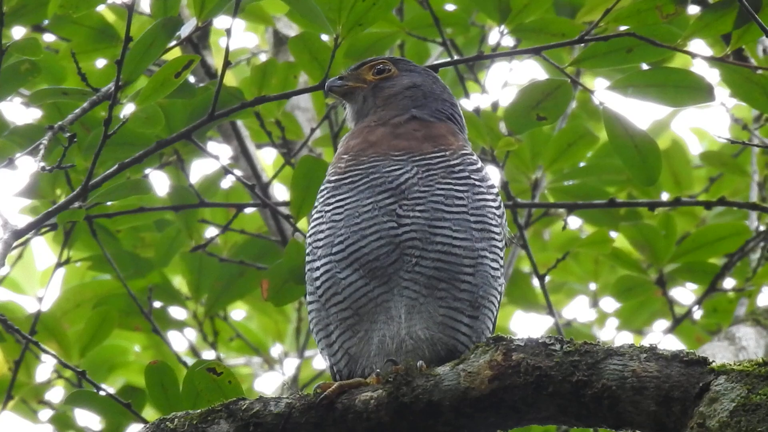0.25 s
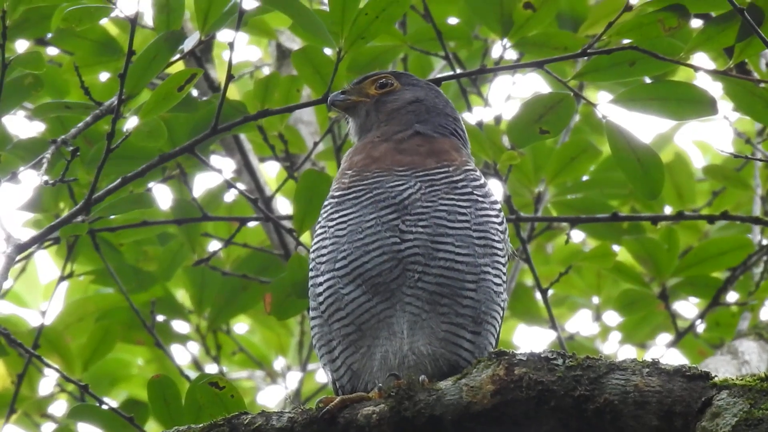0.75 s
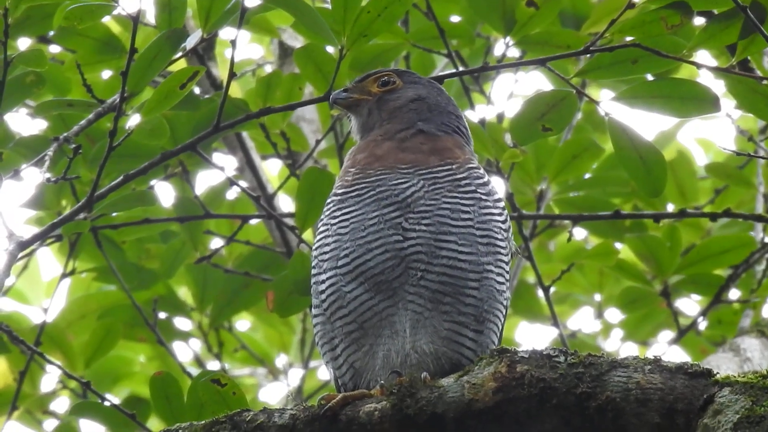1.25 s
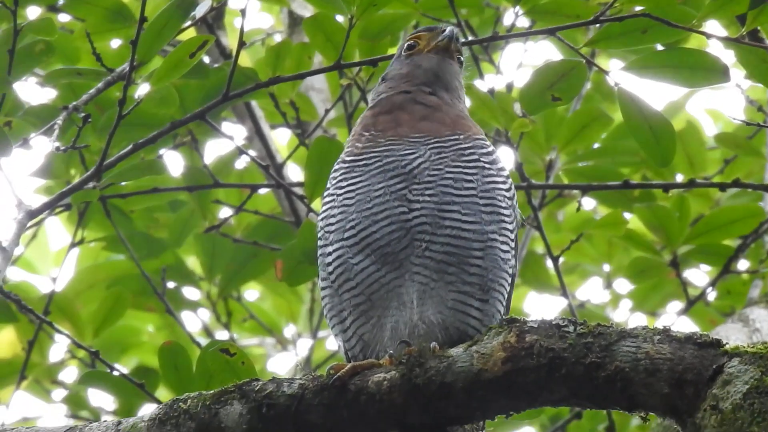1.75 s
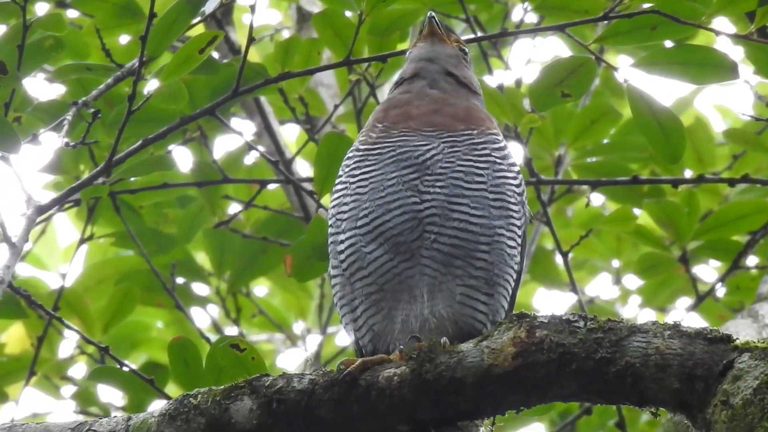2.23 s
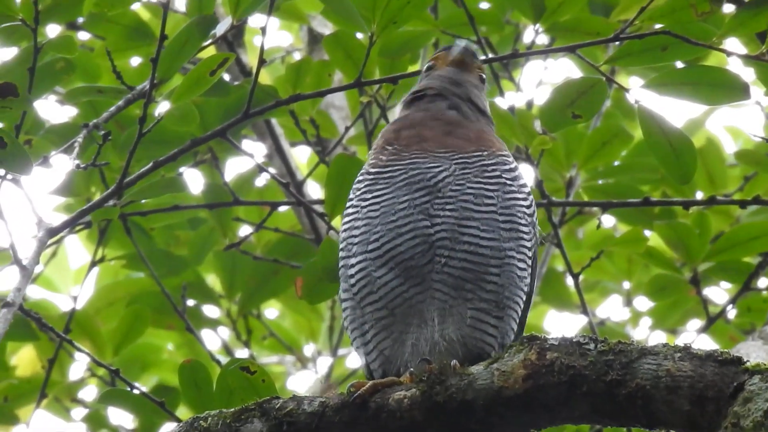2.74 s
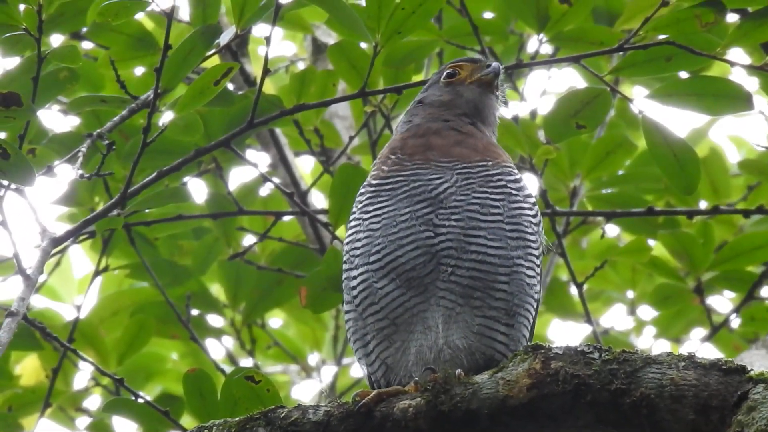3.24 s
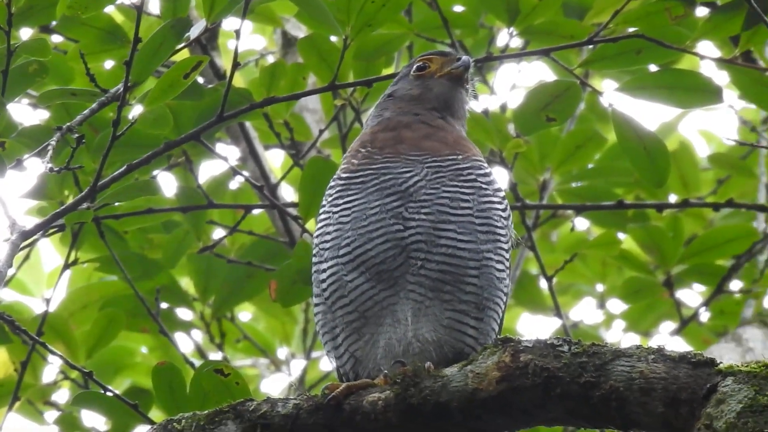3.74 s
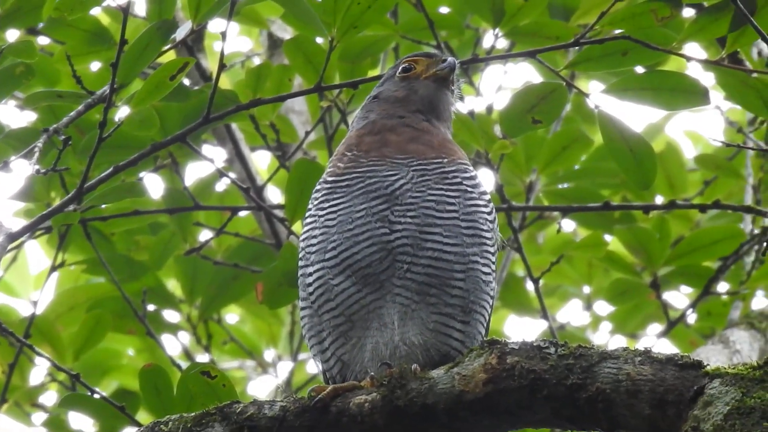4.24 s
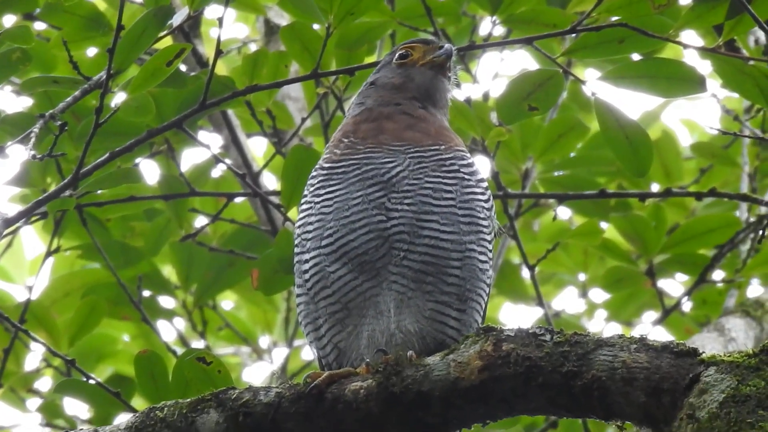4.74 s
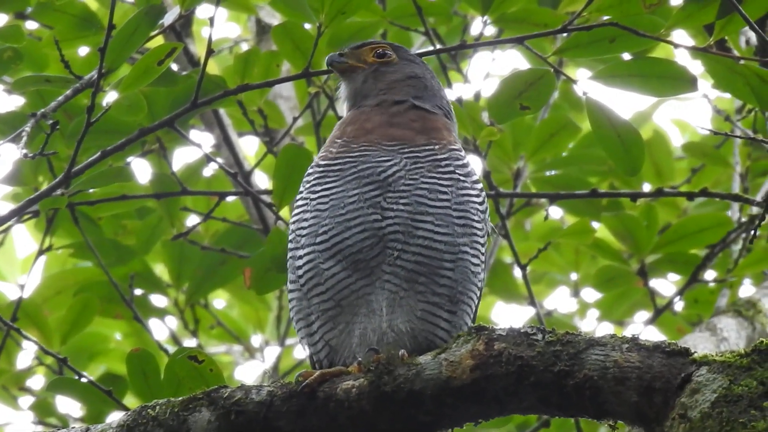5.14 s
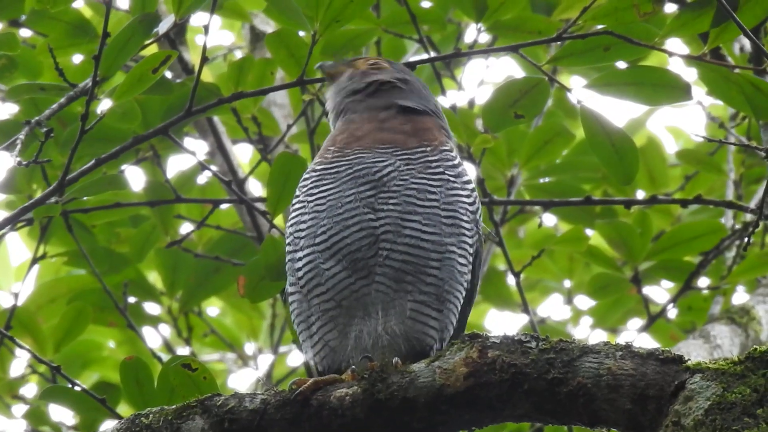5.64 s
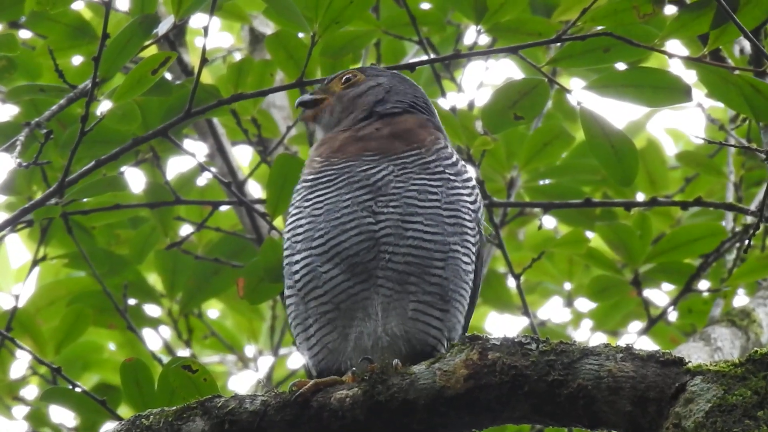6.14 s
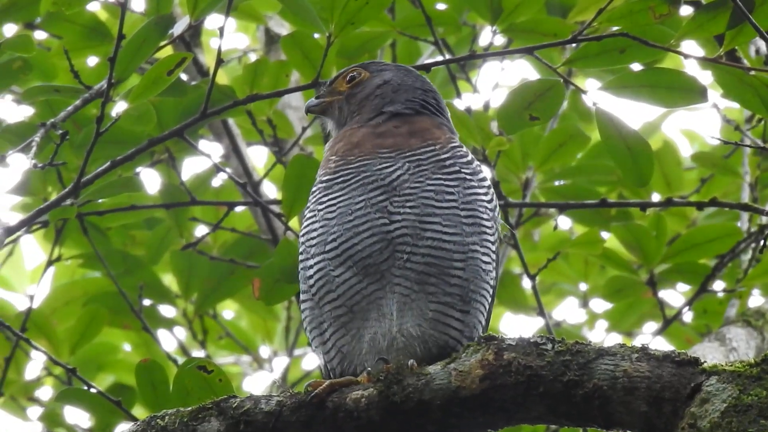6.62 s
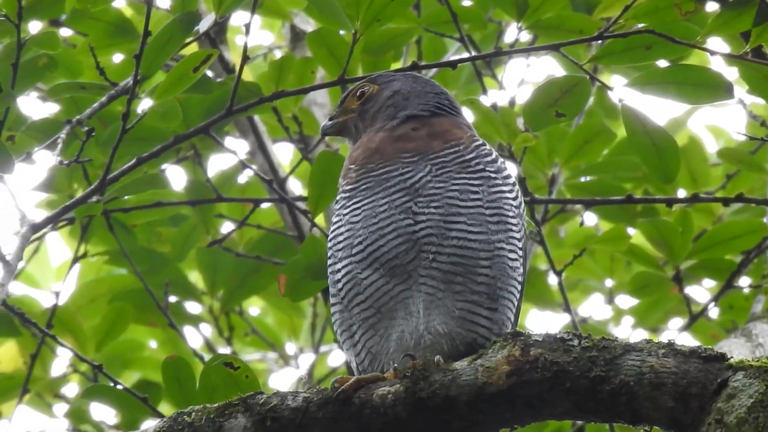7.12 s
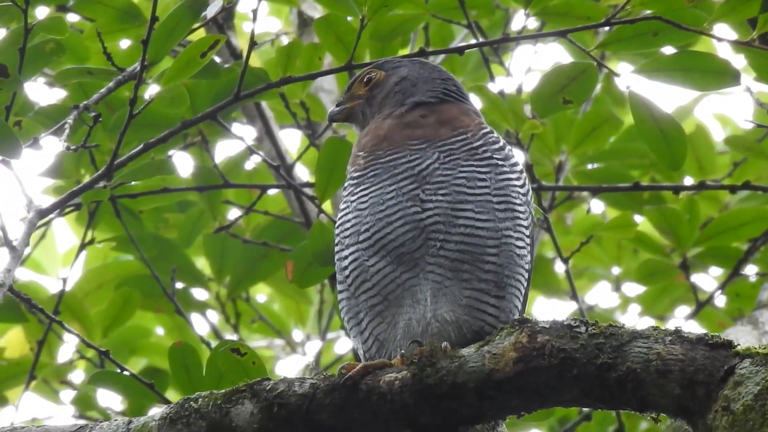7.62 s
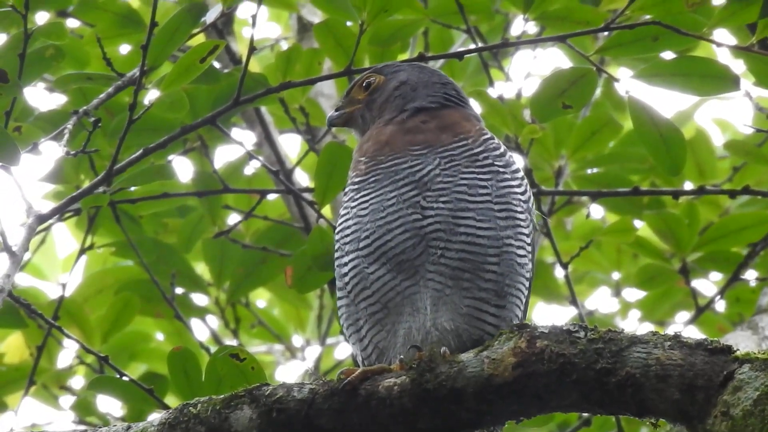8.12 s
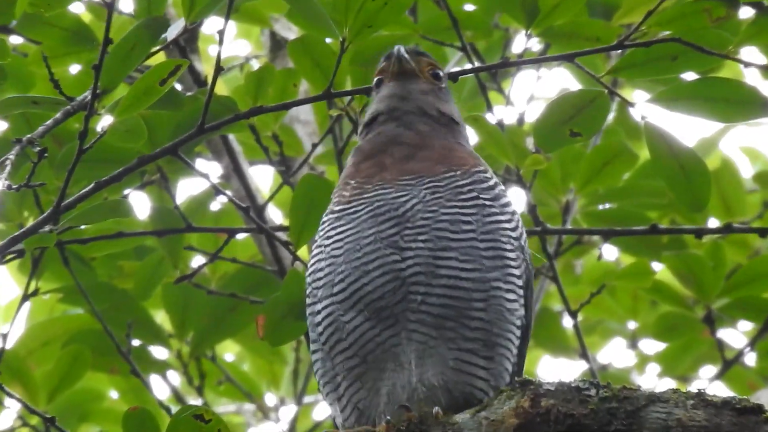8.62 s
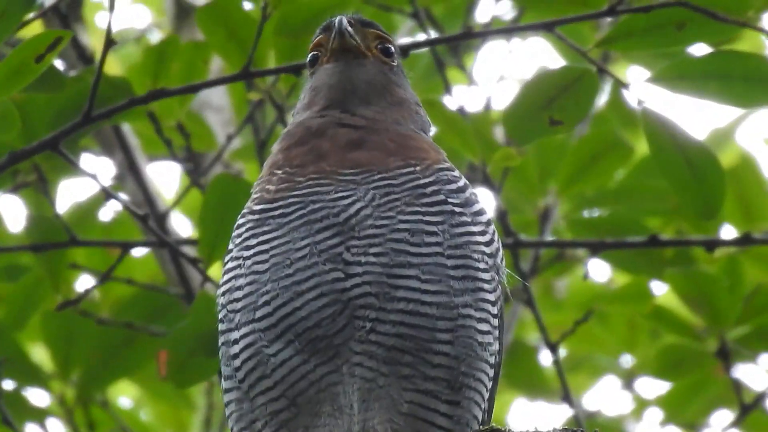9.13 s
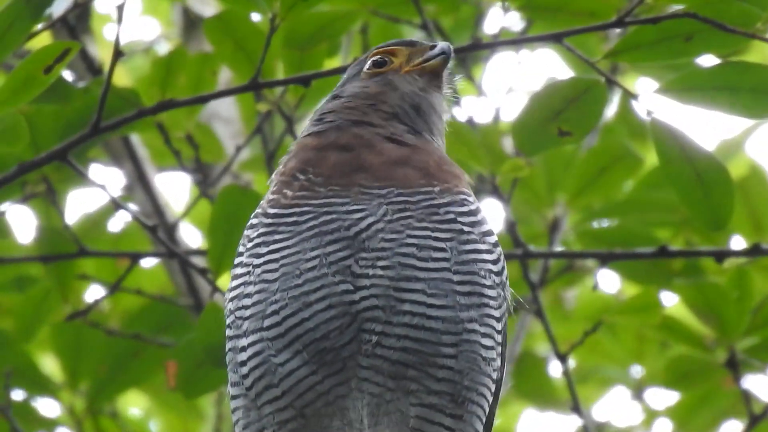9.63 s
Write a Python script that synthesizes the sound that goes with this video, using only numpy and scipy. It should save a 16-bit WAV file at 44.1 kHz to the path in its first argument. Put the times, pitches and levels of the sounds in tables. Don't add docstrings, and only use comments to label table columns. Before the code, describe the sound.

Forest ambience lasts about ten seconds: low, soft distant air and leaves with a faint steady insect hiss near 6 kHz. A high rising chirp is already under way at the start, then a bright arched call at 0.5 s and thin, distant seeps. Echoing scolding chips recur about once a second. A close falcon gives a soft falling hoot at 1.6 s, then four harsh, sagging yelps from 2.3 to 2.9 s, the middle two highest. Small birds continue, with a rising call at 3.8 s and a buzzy trill at 4.4 s. The falcon hoots at 5.0 s and barks again from 5.7 to 6.3 s. Another loud rising chirp comes at 8.1 s. A lens motor whirs from 8.4 to 9.2 s, swelling close to the microphone, with small knocks and a sharp click at 9.1 s. The falcon hoots at 8.7 s, then gives an opener and two barks from 9.3 to 9.7 s.

```python
import sys
import numpy as np
from scipy import signal
from scipy.io import wavfile
from scipy.ndimage import uniform_filter1d

SR = 44100
rng = np.random.default_rng(int(sys.argv[2]) if len(sys.argv) > 2 else 0)


def decibels_to_gain(level_db):
    exponent = np.asarray(level_db, float) / 20
    return 10 ** exponent


def dump(signal):
    limited = np.clip(np.atleast_2d(signal).T, -1, 1)
    pcm = np.round(limited * 32767).astype(np.int16)
    wavfile.write(sys.argv[1], SR, pcm)


N = 435266
LEAD = 4410

# start in seconds, length in seconds, effort in dB, first pitch in Hz.
HOOT_NOTES = [
    (1.644, 0.053, -22, 908),
    (5.008, 0.06, -22, 914),
    (8.68, .049, -21.5, 939),
]
OPENER_NOTES = [
    (2.281, 0.061, -18, 1057),
    (5.723, 0.061, -18.5, 1020),
    (9.339, .056, -16.5, 1052),
]
BARK_NOTES = [(2.472, 0.048, -12, 1323), (2.618, 0.043, -12.5, 1340), (5.935, 0.046, -13, 1342),
              (6.081, 0.035, -12, 1365), (9.533, 0.052, -13, 1335), (9.681, 0.045, -12, 1360)]
CLOSER_NOTES = [
    (2.818, .052, -12.5, 1188),
    (6.277, .052, -13.5, 1198),
]
# share of the length, share of the first pitch, effort in dB, beak ring in dB.
HOOT_SHAPE = [(0, 1, -5.5, 27), (0.302, 0.92, 1.5, 22.5), (0.601, .86, -9, 21), (1, .73, -9.5, 25)]
OPENER_SHAPE = [(0, 0.99, -1, 8), (0.169, .96, -1.5, 19.4), (0.682, .835, -3, 20), (1, .65, -13, 16)]
BARK_SHAPE = [(0, 0.97, -1, 6.2), (.2, .885, -1.5, 2.4), (.66, .68, -5.5, 8), (1, .615, -14.5, 11)]
CLOSER_SHAPE = [(0, 0.97, -1, 2.8), (.33, 0.98, -2, 2.3), (.62, .785, -6, 9), (1, .69, -14, 14)]


def falcon(mix, tails):
    falcon_notes(mix, tails, HOOT_NOTES, HOOT_SHAPE,
                 ring_hz=(7100, 6900), bright_db=(-4.5, -12), chest_db=(3.5, 9))
    falcon_notes(mix, tails, OPENER_NOTES, OPENER_SHAPE,
                 ring_hz=(7000, 6700), bright_db=(.6, -7), chest_db=(-2.5, 7))
    falcon_notes(mix, tails, BARK_NOTES, BARK_SHAPE,
                 ring_hz=(6350, 6800), bright_db=(3.5, -6.5), chest_db=(-1.5, 3.5))
    falcon_notes(mix, tails, CLOSER_NOTES, CLOSER_SHAPE,
                 ring_hz=(6000, 6800), bright_db=(6, -5.5), chest_db=(-4.5, 3.5))


# frequency in Hz, gain in dB.
THROAT_COLOUR = [(550, -3.5), (1000, -6), (1400, -13), (1900, -1.5), (2500, -0.5), (3100, -0.5),
                 (4300, -8.5), (5500, -2.5), (8300, -8), (9600, -12), (10900, -22.5), (13000, -47.5),
                 (15500, -53)]
VOICE_FOLDS = [-4, 9, -7, -9, -7.5, -5.5]
# delay in seconds, level in dB.
NEAR_BRANCHES = [(.0045, -8.5), (.009, -10), (.015, -13)]


def falcon_notes(mix, tails, calls, shape, ring_hz, bright_db, chest_db):
    hum_s, yelp_s = .013, .018
    share, *form = np.transpose(shape)
    for start, length, top_db, top_hz in calls:
        t = np.arange(-hum_s, length + yelp_s, 1 / SR)
        u = t / length
        sag, effort_db, ring_db = (np.interp(u, share, column) for column in form)
        hum = np.interp(t, [-hum_s, -.004, -.002], [1.6, 1, 0])
        yelp = np.clip((t - length) / yelp_s, 0, 1)
        effort_db = top_db + effort_db - 17 * hum - 17 * yelp
        wobble = np.interp(u, [0, 1], [.005, .046]) * wander(len(t), 77.5)
        hz = top_hz * sag * (1 - .26 * yelp) * (1 + wobble)
        turns = np.cumsum(hz) / SR
        cavity_hz = np.interp(u, [0, 1], ring_hz)
        shine_db = np.interp(u, [0, 1], bright_db) - 14 * hum
        stretch = (1100 / top_hz) ** .5 - 1
        stack = 0
        for k, folds_db in enumerate(np.pad(VOICE_FOLDS, (0, 14), "edge"), 1):
            tone_hz = k * hz
            throat_db = read(THROAT_COLOUR, tone_hz * (1 + stretch * np.exp(-(tone_hz / 5000) ** 2)))
            ring = (ring_db - 9 * hum) * np.exp(-((tone_hz - cavity_hz) / 600) ** 2)
            treble = shine_db * np.clip((tone_hz - 3500) / 1500, 0, 1)
            if k > 1:
                uneven = min(1.16 * k, 4.5) * wander(len(t), 250)
            else:
                uneven = np.interp(u, [0, .6], chest_db) + 2.4 * wander(len(t), 300)
            gain = decibels_to_gain(folds_db + throat_db + ring + treble + uneven) * (tone_hz < 15700)
            stack = stack + gain * np.cos(2 * np.pi * k * turns + k * k)
        hoarse = 1 + 0.14 * wander(len(t), 60)
        effort = uniform_filter1d(decibels_to_gain(effort_db - 5.5), size=90)
        note = effort * stack * hoarse * signal.windows.tukey(len(t), .1)
        note = signal.sosfilt(signal.butter(4, 420, "high", fs=SR, output="sos"), note)
        note = np.pad(note, (0, SR // 20))
        limbs = sum(decibels_to_gain(db) * np.roll(note, round(s * rng.uniform(.8, 1.2) * SR)) for s, db in NEAR_BRANCHES)
        add(mix, start + t[0], echoes(note + limbs, tails, wet_db=-6.0, build_s=0.0017, pan_db=1.5))


# start in seconds, length in seconds, level in dB.
SCOLD_CHIPS = [(0.044, 0.022, -24), (1.328, 0.021, -24.5), (2.142, 0.024, -24.5), (2.92, 0.024, -22.5),
               (3.72, 0.019, -24), (4.752, .029, -25), (5.735, .034, -27), (6.743, 0.023, -23),
               (7.938, 0.028, -24.5), (9.007, 0.017, -21.5)]
# from Hz, to Hz.
SCOLD_SWEEP = (1440, 2880)
# start in seconds, length in seconds, from Hz, to Hz, level in dB.
RISING_CALLS = [
    (-.07, 0.066, 4200, 6240, -18.5),
    (3.811, 0.053, 4060, 6365, -18.5),
    (8.138, 0.065, 4180, 6395, -16.5),
]
ARCHED_CALLS = [
    (.518, 0.044, 4550, 8190, -18),
    (4.341, .038, 5120, 7070, -37),
    (4.37, 0.11, 4240, 8010, -22),
    (8.836, 0.076, 4444, 8220, -21.5),
]
DROPPING_CALLS = [
    (.579, 0.014, 6000, 2540, -23.5),
    (4.436, 0.014, 6600, 3820, -25.5),
    (8.901, 0.013, 6470, 4060, -24),
]
CHUP_CALLS = [
    (.594, 0.034, 1410, 3500, -39),
    (.604, 0.028, 3070, 3546, -31.5),
    (5.225, .014, 2310, 3500, -38),
    (5.237, 0.024, 3400, 3727, -31),
    (5.243, 0.019, 1900, 3370, -35),
]
CLOSE_CHIPS = [
    (9.155, 0.009, 3070, 3570, -27),
    (9.162, .04, 2356, 3710, -27.5),
    (9.265, 0.017, 2997, 3630, -32),
    (9.277, 0.034, 2260, 3380, -30.5),
]
SEEP_CALLS = [(0.449, 0.056, 6870, 6540, -37), (.944, .25, 7080, 6650, -39),
              (1.519, 0.044, 6900, 7280, -44), (1.801, 0.23, 7000, 6460, -38),
              (3.637, 0.16, 6780, 6950, -36), (3.95, 0.062, 7630, 7200, -39.5),
              (4.971, .16, 7000, 6400, -36), (6.51, .26, 7000, 6390, -36.5), (7.531, 0.24, 6705, 6490, -38),
              (8.399, 0.3, 6580, 6280, -38.5)]
# start in seconds, length in seconds, pitch in Hz, level in dB.
FAR_PIPES = [(1.42, 0.018, 2050, -52), (1.575, .05, 2280, -57), (4.245, 0.075, 6700, -58),
             (4.349, .019, 2500, -52.5), (4.4, .027, 1963, -55), (4.49, 0.033, 2100, -61),
             (5.142, 0.1, 5140, -52), (5.425, 0.066, 5020, -52.5), (5.626, 0.1, 4640, -57.5),
             (6.966, 0.11, 3770, -60), (8.463, 0.033, 2395, -53), (8.969, 0.11, 2300, -52)]


def canopy(mix, tails):
    scolds = [(s, length, *SCOLD_SWEEP, db) for s, length, db in SCOLD_CHIPS]
    pipes = [(s, length, hz, hz - 50, db) for s, length, hz, db in FAR_PIPES]
    songbird(mix, tails, scolds, lambda u: u ** 1.8, [2.5, 8.0, 5.5, -4, -3, -12.5],
             wet_db=8.0, build_s=.006, waver=0.05, swell=1.5, pan_db=2.5, open_db=17)
    songbird(mix, tails, RISING_CALLS, lambda u: np.minimum(u / .75, 1) ** 0.78, [0, -15],
             wet_db=12, build_s=0.0037, waver=0.01, swell=2.3)
    songbird(mix, tails, ARCHED_CALLS, trill, [0], wet_db=10.5, build_s=0.0012, waver=0.0068, swell=0.59)
    songbird(mix, tails, DROPPING_CALLS, straight, [0], wet_db=15.0, build_s=0.0023, waver=0.021, swell=1.0)
    songbird(mix, tails, CHUP_CALLS, lambda u: np.sin(2.4 * u), [0, -19, -30],
             wet_db=2, build_s=.008, waver=0.051, swell=0.82)
    songbird(mix, tails, CLOSE_CHIPS, lambda u: 0.228 * u + 1.095 * u ** 6, [-6, 0, -20],
             wet_db=1.0, build_s=0.0042, waver=0.029, swell=3.9, open_db=10)
    songbird(mix, tails, SEEP_CALLS, straight, [0], wet_db=13.5, build_s=0.0073, waver=0.15, swell=0.16)
    songbird(mix, tails, pipes, straight, [0], wet_db=1, build_s=0.026, waver=0.0047, swell=.7)


def straight(u):
    return u


def trill(u):
    return np.minimum(u / 0.25, 1) ** 0.52 - 0.64 * u * np.sin(np.pi * 17 * u) ** 2


# frequency in Hz, gain in dB.
BEAK_COLOUR = [(1500, -41), (2200, -18.5), (3500, -9), (4200, -7.5), (5400, 1), (6100, 1.5), (7000, 0),
               (8300, -10.5), (10000, -12.5), (13000, -51.5)]


def songbird(mix, tails, calls, glide, overtones_db, wet_db, build_s, waver, swell, pan_db=2.0, open_db=0):
    for s, length, from_hz, to_hz, db in calls:
        u = np.linspace(0, 1, round(length * SR))
        flutter = waver * np.clip(wander(len(u), 30), -2.5, 2.5) ** 3 / 4
        hz = (from_hz + (to_hz - from_hz) * glide(u)) * (1 + flutter)
        turns = np.cumsum(hz) / SR
        tone = 0
        for k, overtone_db in enumerate(overtones_db, 1):
            closed_db = open_db * (k > 1) * (1 - u)
            gain = decibels_to_gain(overtone_db + read(BEAK_COLOUR, k * hz) - closed_db)
            tone = tone + gain * np.sin(2 * np.pi * k * turns)
        breath = np.sin(np.pi * u ** swell) ** 0.12
        call = decibels_to_gain(db - wet_db) * evened(tone) * breath
        add(mix, s, echoes(call, tails, wet_db, build_s, pan_db))


# time in seconds, whir level in dB.
MOTOR_WHIR = [(8.42, -59), (8.44, -51), (8.65, -47.5), (8.84, -44.5), (9.0, -40.5), (9.04, -35),
              (9.11, -32), (9.16, -39.5), (9.23, -66)]
# frequency in Hz, width in Hz, level in dB.
GEAR_BANDS = [(745, 680, 8.5), (900, 160, -3), (1248, 87, 8), (2500, 150, -29), (3400, 900, 2)]
# time in seconds, peak in dB, treble tilt in dB.
STOP_CLICKS = [(8.058, -27, -14), (8.452, -30, -52), (8.896, -27, -22), (9.083, -30, -22),
               (9.1135, -3.5, 5), (9.132, -29, -25), (9.15, -29, -20)]
# frequency in Hz, level in dB, 60 dB decay in seconds.
SHELL_MODES = [(156, -29, 0.069), (1098, -0.5, 0.028), (1900, -7, 0.024), (4200, -6, 0.011),
               (7000, 15, 0.004), (5730, 0, 0.0089), (8600, -7, 0.0046), (11000, -21, 0.0095),
               (13500, -18, .005)]


def lens(mix):
    s, whir_db = np.transpose(MOTOR_WHIR)
    t = np.arange(s[0], s[-1], 1 / SR)
    teeth = rng.standard_normal(len(t)) * decibels_to_gain(1.7 * wander(len(t), 360))
    whir = 0
    for hz, width, db in GEAR_BANDS:
        rattle = signal.filtfilt(*signal.iirpeak(hz, hz / width, SR), teeth)
        whir = whir + decibels_to_gain(db + 5.0 * wander(len(t), 900)) * evened(rattle)
    whir = decibels_to_gain(np.interp(t, s, whir_db)) * evened(whir) * signal.windows.tukey(len(t), .1)
    add(mix, s[0], whir * np.ones((2, 1)))
    t = np.arange(4000) / SR
    for s, db, treble_db in STOP_CLICKS:
        ring = 0
        for hz, mode_db, t60 in SHELL_MODES:
            tilt_db = treble_db * np.clip(np.log2(hz / 160) / 4, 0, 1)
            ring = ring + decibels_to_gain(mode_db + tilt_db - 60 * t / t60) * np.sin(2 * np.pi * hz * t)
        ring *= 1 - np.exp(-t / 0.00052)
        add(mix, s, decibels_to_gain(db) * ring / abs(ring).max() * np.ones((2, 1)))


# frequency in Hz, density in dB per Hz.
WASH_COLOUR = [(15, -56), (25, -21.5), (49, 13), (96, -9.5), (161, -4), (194, 2), (247, -7.5), (602, -14),
               (1430, -17.5), (2250, -21.5), (2950, -20.5), (5060, -18.5), (5950, -24.5), (7180, -22.5),
               (15700, -41.5)]


def wash():
    air_db, insect_db, insect_hz, insect_width_hz = -45.5, -51.5, 6000, 640
    frames, hz = N // 256 + 5, np.fft.rfftfreq(1024, 1 / SR)
    a, b, c, d, patches = rng.standard_normal((frames, 513, 5)).T
    patches = evened(uniform_filter1d(uniform_filter1d(patches, 30, 0), 12, 1))
    hiss = ported(a + 1j * b, c + 1j * d, hz)
    rustle = np.exp(-(np.log(hz / 1600 + 1e-9) / 0.32) ** 2)[:, None] * wander(frames, 5.5)
    air_gain = decibels_to_gain(read(WASH_COLOUR, hz)[:, None] + 2.0 * patches + 2.9 * rustle)
    air = signal.istft(hiss * air_gain, nperseg=1024, noverlap=768)[1]
    band = np.exp(-((hz - insect_hz) / insect_width_hz) ** 2)[:, None] * decibels_to_gain(0.5 * wander(frames, 60))
    insects = signal.istft(hiss[..., ::-1] * band, nperseg=1024, noverlap=768)[1]
    return (decibels_to_gain(air_db) * evened(air) + decibels_to_gain(insect_db) * evened(insects))[:, :N]


# frequency in Hz, 60 dB decay in seconds.
FOREST_DECAY = [(700, 0.6), (2200, 0.68), (4000, 0.49), (6500, 0.57), (10000, 0.29)]
# frequency in Hz, gain in dB.
LEAF_SCATTER = [(600, -10), (1200, 4), (2300, -3.5), (4000, 0), (7000, 3.5)]


def forest(count=10, size=33024):
    taps = rng.standard_normal((count, 2, size)) * (rng.random((count, 2, size)) < .06)
    hz, t, z = signal.stft(taps, SR, nperseg=256)
    decay_db = read(LEAF_SCATTER, hz)[:, None] - 60 * t / read(FOREST_DECAY, hz)[:, None]
    z = ported(z[:, 0], z[:, 1], hz) * decibels_to_gain(decay_db)
    return signal.istft(z, SR, nperseg=256)[1].swapaxes(0, 1)


def echoes(x, tails, wet_db, build_s, pan_db):
    gather = 1 - np.exp(-np.arange(tails.shape[2]) / SR / build_s)
    tail = tails[rng.integers(len(tails))] * gather
    tail *= decibels_to_gain(wet_db) / np.linalg.norm(tail[0])
    tail[:, :2] += [.65, .35]
    return signal.fftconvolve(x[None], tail, axes=1) * decibels_to_gain(np.array([[pan_db], [-pan_db]]) / 2)


# frequency in Hz, left-right likeness from 0 to 1.
PORT_LIKENESS = [(60, 0.96), (180, 0.82), (550, 0.71), (1650, 0.54), (4970, 0.14), (15000, 0.017)]


def ported(left, other, hz):
    same = np.clip(read(PORT_LIKENESS, hz), -1, 1)[:, None]
    return np.array([left, same * left + np.sqrt(1 - same ** 2) * other])


def evened(x):
    return x / np.sqrt(np.mean(x ** 2) + 1e-20)


def read(points, hz):
    f, value = np.transpose(points)
    return np.interp(np.log(hz + 1), np.log(f + 1), value)


def wander(count, span):
    return evened(uniform_filter1d(rng.standard_normal(count), max(int(span), 1)))


def add(mix, s, sound):
    part = mix[:, LEAD + round(s * SR):][:, :sound.shape[1]]
    part += sound[:, :part.shape[1]]


def scene():
    mix, tails = np.zeros((2, N + LEAD)), forest()
    falcon(mix, tails)
    canopy(mix, tails)
    lens(mix)
    return mix[:, LEAD:] + wash()


def band_limit(x):
    return signal.sosfilt(signal.butter(12, 16400, fs=SR, output="sos"), x)


def record(dry):
    no_bass = signal.sosfilt(signal.butter(6, 55, "high", fs=SR, output="sos"), dry)
    low_pass = signal.firwin(511, 15800, window=("kaiser", 9), fs=SR)
    band = signal.oaconvolve(no_bass, low_pass[None], "same")
    return band_limit(band)


dry = scene()
out = record(dry)
dump(out)
```